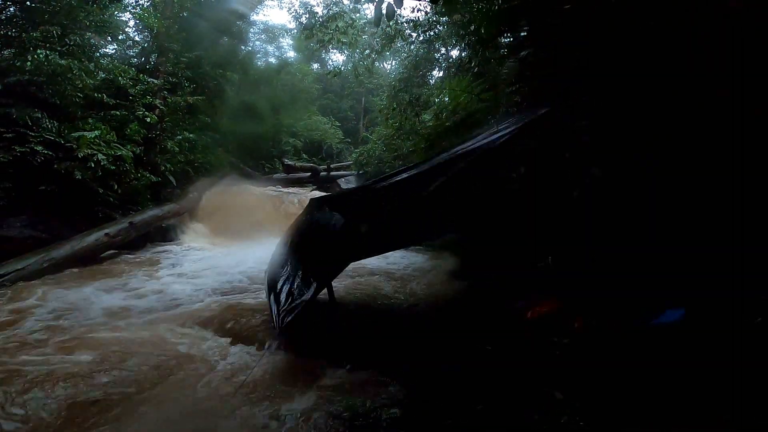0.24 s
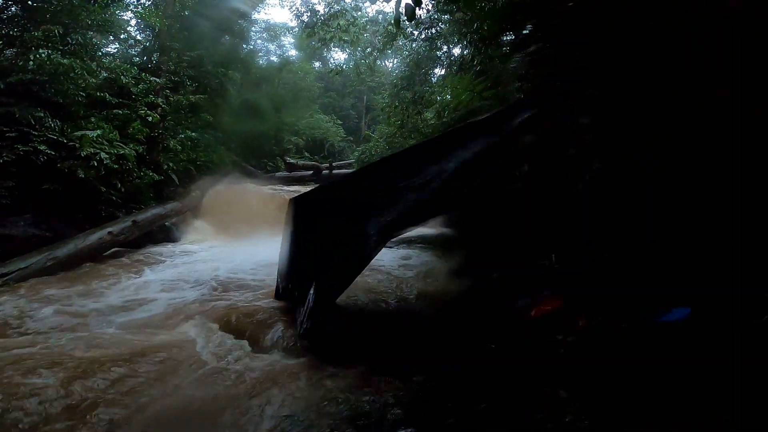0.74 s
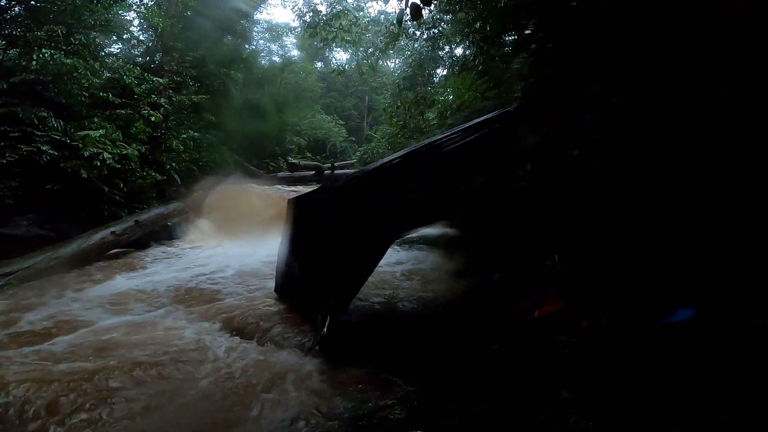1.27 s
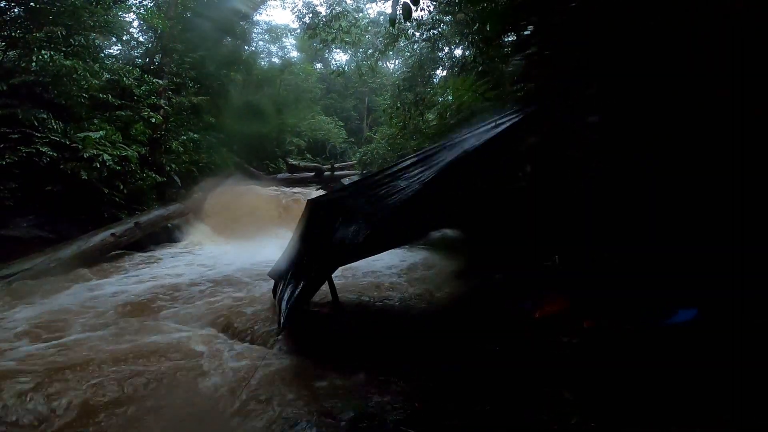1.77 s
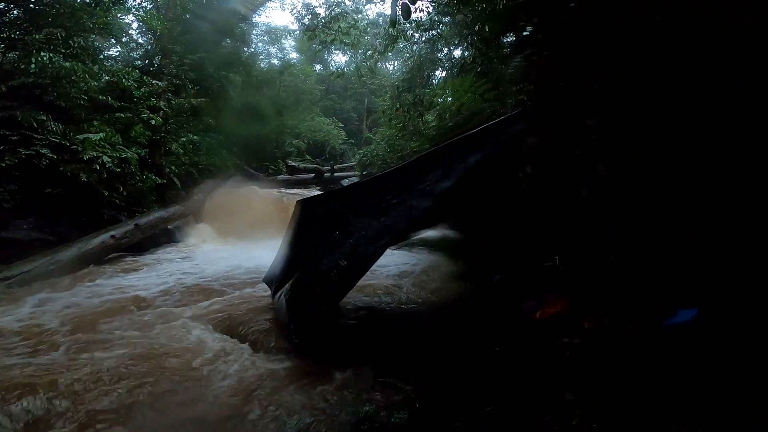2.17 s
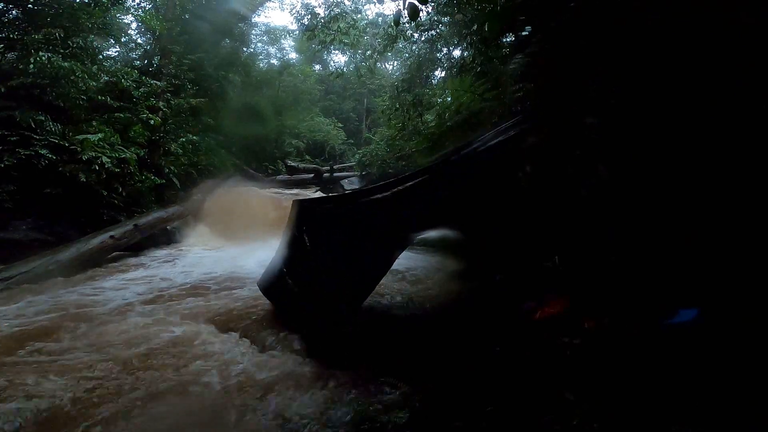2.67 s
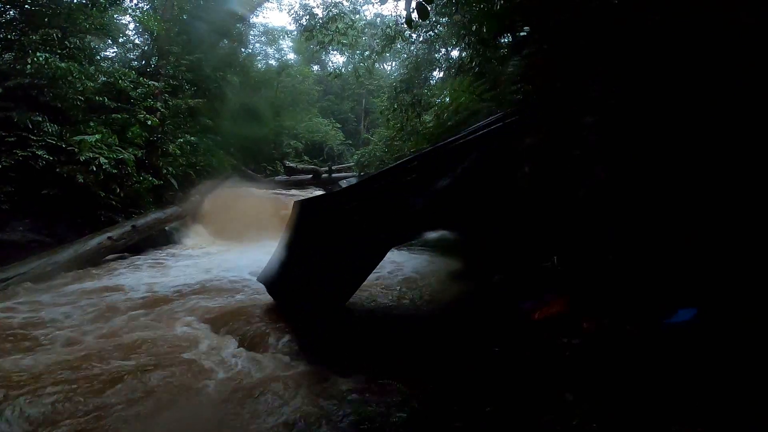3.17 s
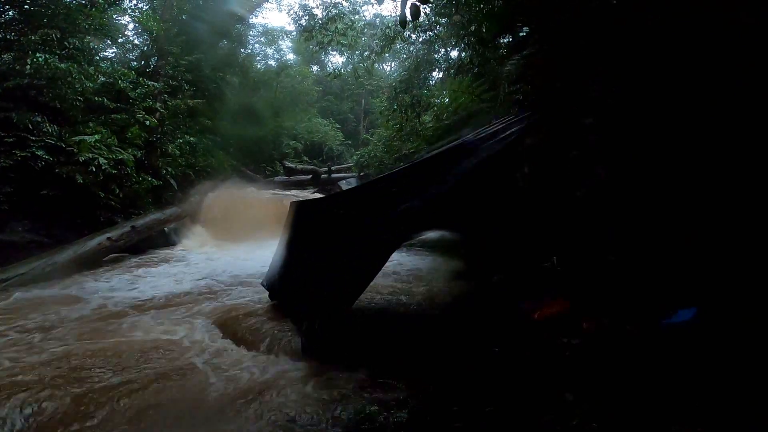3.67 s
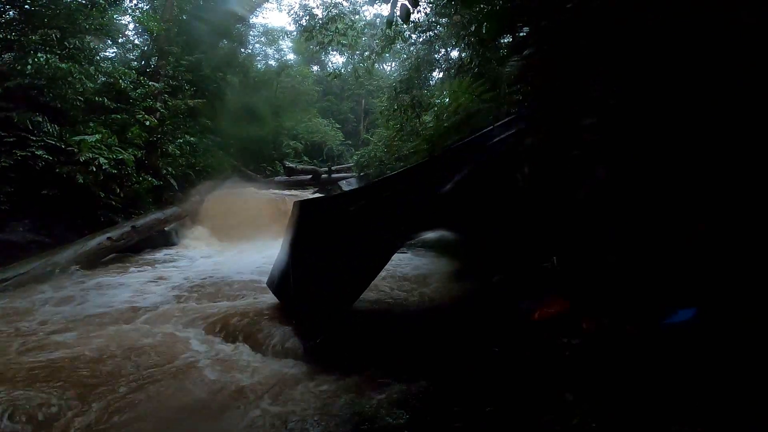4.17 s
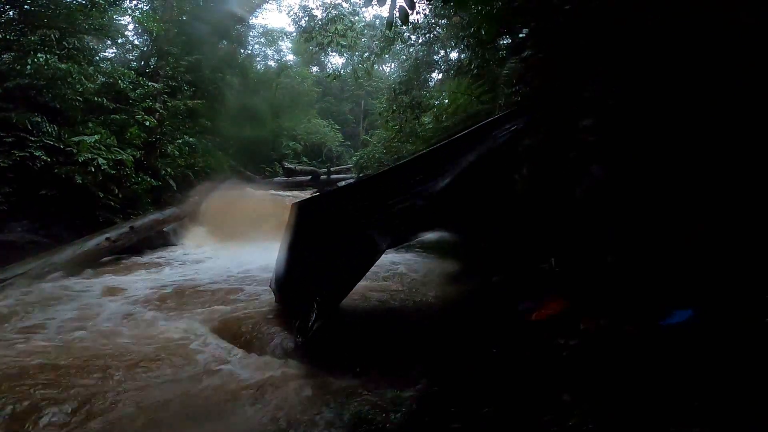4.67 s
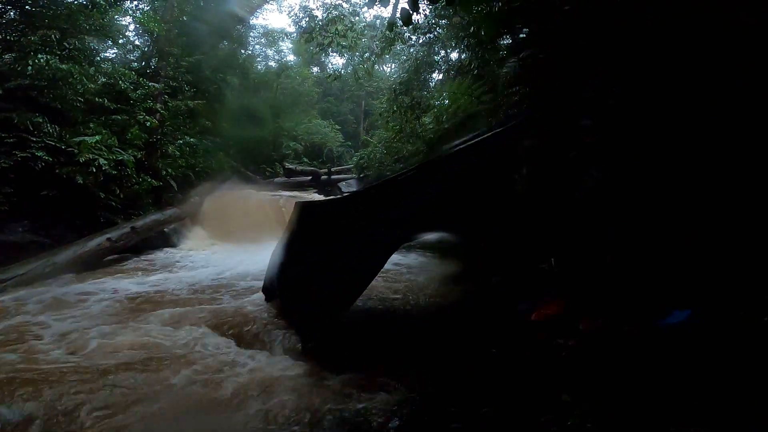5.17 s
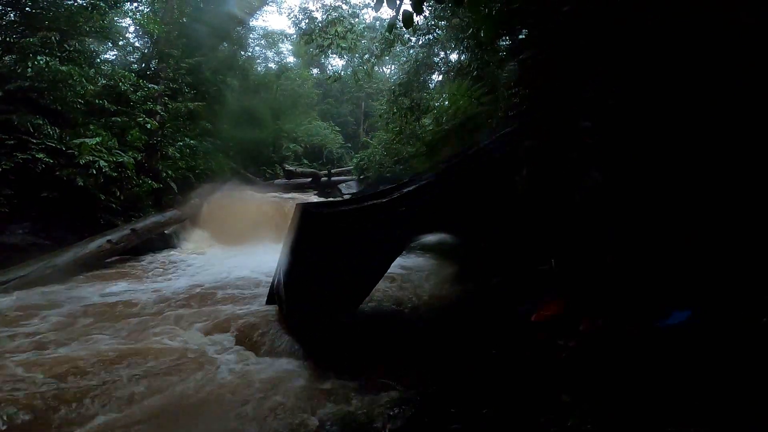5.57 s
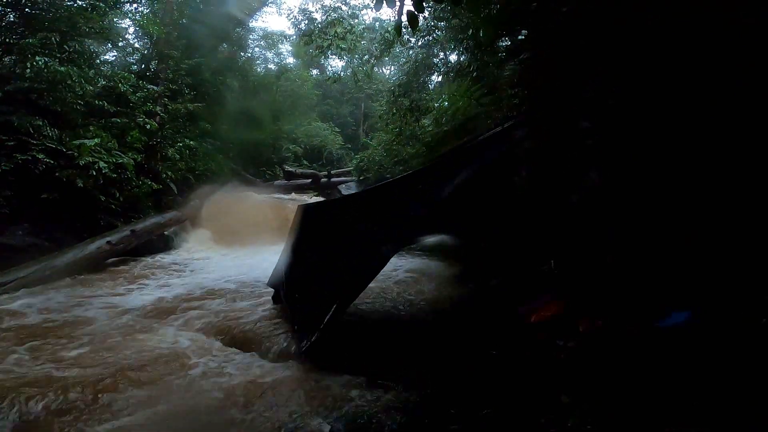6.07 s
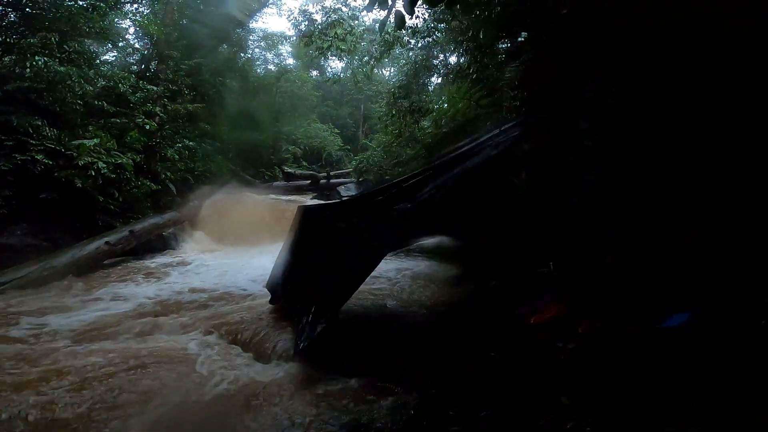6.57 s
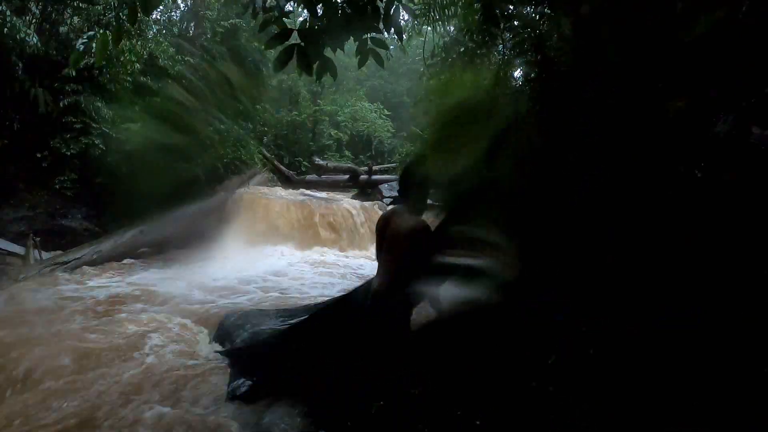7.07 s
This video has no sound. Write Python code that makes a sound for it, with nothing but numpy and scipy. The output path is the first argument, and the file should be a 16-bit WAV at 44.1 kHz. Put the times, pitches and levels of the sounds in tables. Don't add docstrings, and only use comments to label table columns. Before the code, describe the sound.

Loud continuous rush of muddy floodwater dropping into a churning pool, heard close through a wet housing, cut off suddenly.

```python
import sys
import numpy as np
from scipy import signal
from scipy.io import wavfile
from scipy.ndimage import uniform_filter1d, minimum_filter1d

SR = 44100
rng = np.random.default_rng(int(sys.argv[2]) if len(sys.argv) > 2 else 0)


def magnitude_from_level(level_db):
    exponent = np.asarray(level_db, float) / 20
    return 10 ** exponent


def bounce(signal):
    frames = np.transpose(np.atleast_2d(signal))
    limited = np.clip(frames, -1, 1)
    pcm = np.round(limited * 32767).astype(np.int16)
    wavfile.write(sys.argv[1], SR, pcm)


N = 323673

# pitch_hz, level_db (per Hz)
THUD_COLOUR = [(4.7, -38), (8.0, -15.5), (48, 2.5), (120, -3.5), (160, -35), (260, -120)]
# pitch_hz, level_db (per Hz)
PLUNGE_COLOUR = [(71, -37.5), (120, -2), (200, 1), (242, -1), (280, -9), (330, -17), (430, -23),
                 (730, -120)]
# pitch_hz, level_db (per Hz)
CHURN_COLOUR = [(180, -45.5), (300, 0), (467, -5), (2600, -11.5), (3380, -17.5), (5720, -120)]
# pitch_hz, level_db (per Hz)
SPRAY_COLOUR = [(1800, -51.5), (2600, -5.5), (3200, 0), (6000, -6.5), (9500, -13.5), (12000, -20),
                (15500, -28.5), (17000, -61.5)]
# time_s, surge_db
SURGE = [
    (0, -1.5),
    (.7, -0.6),
    (1.2, 1.5),
    (1.9, 0.5),
    (3.4, -1),
    (4.6, 0.8),
    (5.4, -1.5),
    (6, .5),
    (6.84, -0.5),
]
# time_s, swell_db, length_s
AIR_POCKETS = [(0.43, 1.7, 0.066), (0.59, 3, 0.088), (0.82, 2, 0.057), (1.03, 4.5, 0.07), (1.21, 2, 0.21),
               (1.47, 1, 0.09), (2.18, 3.4, 0.07), (2.56, 1.3, 0.14), (3.24, 3.5, 0.059), (3.73, 1.6, 0.14),
               (4.3, 0, 0.12), (4.67, 0, 0.15), (4.77, 3.5, 0.065), (5.24, 2.2, 0.12), (5.71, 3, 0.11),
               (5.91, 2, 0.11), (6.22, 2.0, 0.079), (6.42, 4.5, 0.046), (6.72, 4.3, 0.062)]
# time_s, swell_db, length_s
WATER_SLUGS = [(0.08, 1.5, 0.03), (0.24, 4.5, 0.23), (0.49, 3, 0.049), (0.87, 8, 0.032), (0.97, 3, 0.17),
               (1.35, 2.5, 0.07), (1.6, 3, 0.18), (1.72, 5.5, 0.06), (2.15, 0.5, 0.11), (2.38, 2, 0.09),
               (2.79, -1, 0.09), (3.41, 4, 0.033), (3.65, 4, 0.17), (3.82, 3, 0.089), (4.67, 0.5, 0.13),
               (4.88, 4.3, 0.07), (5.19, 4, 0.045), (5.29, 1.5, 0.08), (5.53, 3.0, 0.095),
               (5.91, 4.5, 0.15), (6.29, 1, 0.07), (6.57, 3, 0.15)]
# pitch_hz, width_hz, level_db
HOUSING = (3860, 380, 10)
# width_hz, level_db
PORT = (560, 13.7)
# start_s, end_s
UNLIKE_STRETCHES = [(0, .24), (.68, 1.37), (1.76, 1.95), (2.85, 3.12), (3.76, 4.56), (5.4, 5.92),
                    (6.01, 6.35)]
# pitch_hz, level_db (per Hz)
RESIDUE_COLOUR = [(20, -13.5), (100, -9.5), (500, -6), (1000, -3.5), (6000, -4), (7400, -8), (9000, -19),
                  (9500, -62.5)]

THUD_DB, PLUNGE_DB, CHURN_DB, SPRAY_DB = -26.5, -22, -22.5, -23.5
POCKET_GAIN, SLUG_GAIN, SPLASH_SHARE, HEAVE_SHARE = 1.84, 1.49, 0.065, 0.15
PORT_START_HZ, PORT_SINK_HZ_PER_S = 5823, 65
FILM_DB_PER_S, FILM_HZ = 0.84, 8000
BUSY_SHARE, STRAY_FRAMES, STRAY_SHARE = 0.66, 0.2, 0.18
CEILING_HZ, CEILING_SINK_HZ_PER_S, BUSY_DROP_HZ, CEILING_SCATTER_HZ = 14250, 50, 350, 300
STUTTER_S, CUT_S = 6.8442, 6.8546
FRAME = 2048


def unit(x):
    return x / np.sqrt(np.mean(np.abs(x) ** 2) + 1e-20)


def along(points, hz):
    point_hz, value = np.transpose(points)
    return np.interp(np.log(hz + 1), np.log(point_hz + 1), value)


def swells(rows, t):
    moment, db, length = np.transpose(rows)[:, :, None]
    coarse = t[::64]
    bumps = db * np.exp(-(3.26 * (coarse - moment) / length) ** 2)
    return np.interp(t, coarse, np.sum(bumps, axis=0))


def steady(x, seconds, share):
    span = int(seconds * SR)
    power = np.abs(uniform_filter1d(uniform_filter1d(x ** 2, span), span))
    return unit(x / (power + 0.05) ** (np.clip(share, 0, 1) / 2))


def droplets(count, spread_db):
    draw = rng.random((count, 3))
    size = magnitude_from_level(-spread_db * np.log(draw[:, 1] + 0.004))
    size = size * np.sign(draw[:, 2] - 0.5)
    place = (draw[:, 0] * N).astype(int)
    return unit(np.bincount(place, size, N))


def rush(colour, patchy_db, bins, frames, grains=0, cavity=None):
    hz, t, z = signal.stft(rng.standard_normal(N) + grains, SR, nperseg=FRAME, noverlap=1536)
    field = uniform_filter1d(rng.standard_normal(z.shape), bins, 0)
    field = uniform_filter1d(field, frames, 1)
    z = z * magnitude_from_level(patchy_db * unit(field) + along(colour, hz)[:, None])
    if cavity:
        gain = cavity(hz[:, None], t)
        weight = np.mean(np.abs(z) ** 2, axis=1, keepdims=True)
        z = z * gain / np.sqrt(np.sum(weight * np.abs(gain) ** 2, axis=0))
    return unit(signal.istft(z, SR, nperseg=FRAME, noverlap=1536)[1][:N])


def resonance(hz, center_hz, width_hz, db):
    return magnitude_from_level(db) * width_hz * center_hz / (center_hz * center_hz - hz * hz + 1j * hz * width_hz)


def cavities(hz, t):
    port_hz = PORT_START_HZ - PORT_SINK_HZ_PER_S * t
    pair = resonance(hz, *HOUSING) + resonance(hz, port_hz, *PORT)
    shell = magnitude_from_level(-1.0) / (1 + (hz / 6000) ** 8)
    film_db = -FILM_DB_PER_S * (t - CUT_S / 2) / (1 + (FILM_HZ / (hz + 1)) ** 4)
    return pair * np.sqrt(1 + shell ** 2 / np.abs(pair) ** 2) * magnitude_from_level(film_db)


def falling_sheet(slug_db):
    thud = rush(THUD_COLOUR, patchy_db=0.5, bins=3, frames=8)
    return magnitude_from_level(THUD_DB + slug_db) * steady(thud, seconds=0.064, share=0.72)


def spray():
    grains = 0.3 * droplets(count=9000, spread_db=5.0)
    fizz = rush(SPRAY_COLOUR, patchy_db=0.35, bins=25, frames=5, grains=grains, cavity=cavities)
    return magnitude_from_level(SPRAY_DB) * fizz


def churning_pool(surge_db, slug_db):
    grains = 0.29 * droplets(count=6000, spread_db=4)
    churn = rush(CHURN_COLOUR, patchy_db=0.7, bins=12, frames=6, grains=grains)
    return magnitude_from_level(CHURN_DB + HEAVE_SHARE * surge_db + SPLASH_SHARE * slug_db) * churn


def plunge(surge_db, pocket_db):
    rumble = rush(PLUNGE_COLOUR, patchy_db=1.55, bins=3, frames=8)
    return magnitude_from_level(PLUNGE_DB + surge_db + pocket_db) * steady(rumble, seconds=0.076, share=0.53)


def waterfall():
    t = np.arange(N) / SR
    surge_db = np.interp(t, *np.transpose(SURGE))
    slug_db = SLUG_GAIN * swells(WATER_SLUGS, t)
    pocket_db = POCKET_GAIN * swells(AIR_POCKETS, t)
    return (falling_sheet(slug_db) + spray()
            + churning_pool(surge_db, slug_db) + plunge(surge_db, pocket_db))


def scene():
    return np.tile(waterfall(), (2, 1))


def limit(x):
    need = np.minimum(1, 0.55 / (np.abs(x[0]) + 1e-9))
    return x * uniform_filter1d(minimum_filter1d(need, size=441), size=221)


def busy(t):
    return sum((t > start) & (t < end) for start, end in UNLIKE_STRETCHES)


def ceiling(x):
    hz, t, z = signal.stft(x, SR, nperseg=FRAME)
    top_hz = CEILING_HZ - CEILING_SINK_HZ_PER_S * t - BUSY_DROP_HZ * busy(t)
    top_hz = top_hz + CEILING_SCATTER_HZ * rng.standard_exponential(len(t))
    keep = 1 / (1 + np.exp(np.clip((hz[:, None] - top_hz) / 30, -30, 30)))
    return signal.istft(z * keep, SR, nperseg=FRAME)[1][..., :N]


def residue():
    hz, t, z = signal.stft(rng.standard_normal(N), SR, nperseg=FRAME)
    pitch = hz[:, None]
    stray = STRAY_SHARE * (rng.random(len(t)) < STRAY_FRAMES) * (pitch < 6500)
    share = np.maximum(BUSY_SHARE * busy(t), stray)
    share = share * (1 - 0.5 * (pitch > 7500))
    band = (12 * np.log(1 + hz / 1200)).astype(int)
    on = rng.random((band.max() + 1, len(t)))[band] < share
    z = z * on * magnitude_from_level(along(RESIDUE_COLOUR, hz))[:, None]
    return unit(signal.istft(z, SR, nperseg=FRAME)[1][:N])


def stutter_and_cut(x):
    t = np.arange(N) / SR
    start, end = round(STUTTER_S * SR), round(CUT_S * SR)
    x[:, start:end] = x[:, 2 * start - end:start]
    fade = np.clip(1 - (t - CUT_S) / 0.029, 0, 1)
    return x * np.where(t < CUT_S, 1, magnitude_from_level(-25.5) * fade)


def roll_off(x):
    return signal.sosfilt(signal.butter(12, 15900, fs=SR, output="sos"), x)


def record(dry):
    x = ceiling(limit(dry))
    x = x + magnitude_from_level(-48) * residue() * [[1], [-1]]
    mix = stutter_and_cut(x)
    return roll_off(mix)


dry = scene()
out = record(dry)
bounce(out)
```